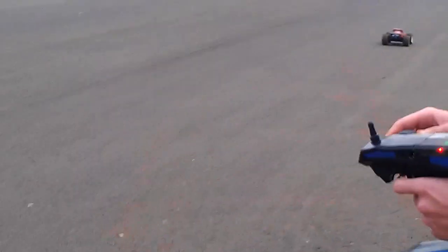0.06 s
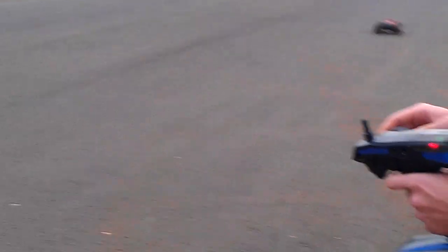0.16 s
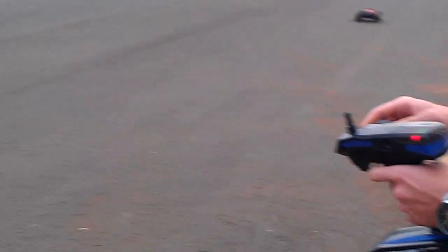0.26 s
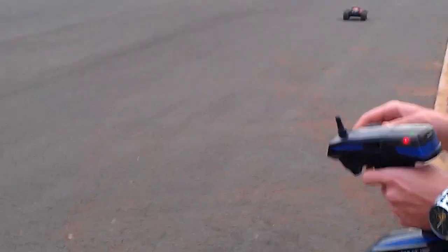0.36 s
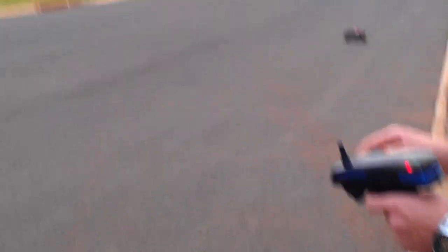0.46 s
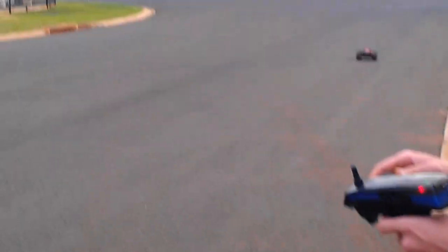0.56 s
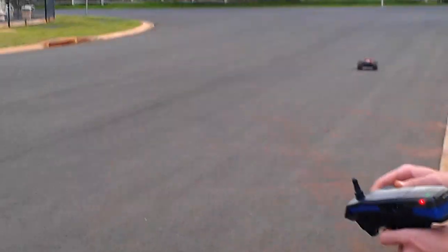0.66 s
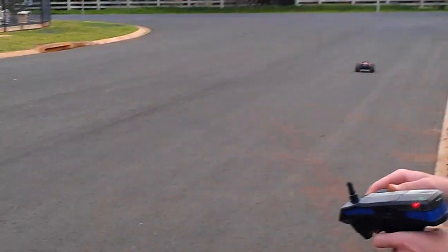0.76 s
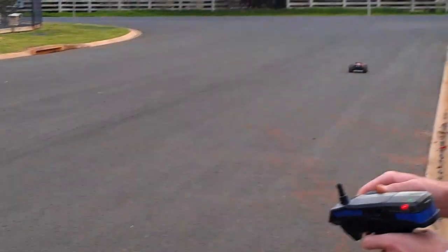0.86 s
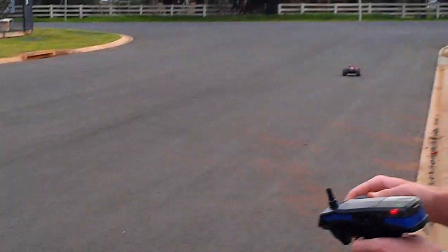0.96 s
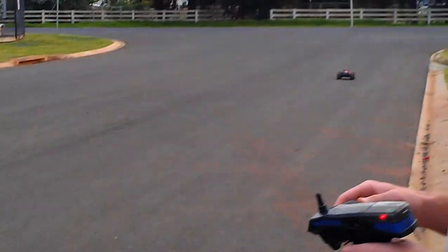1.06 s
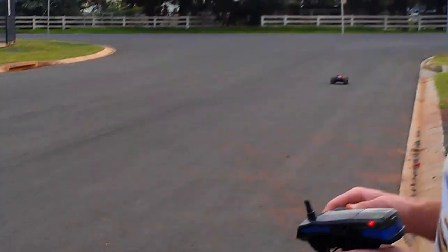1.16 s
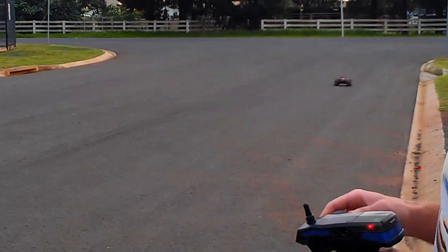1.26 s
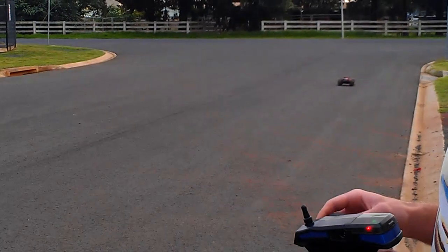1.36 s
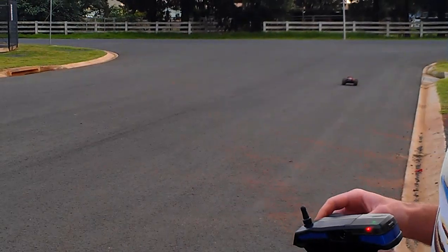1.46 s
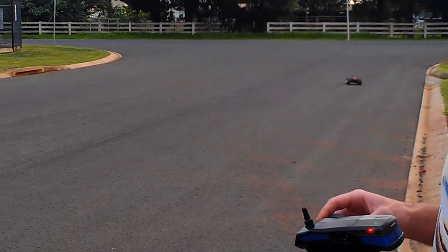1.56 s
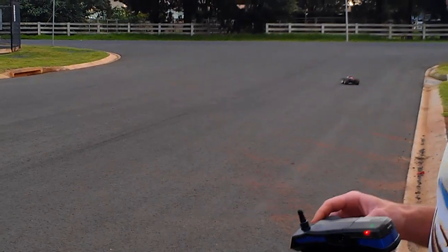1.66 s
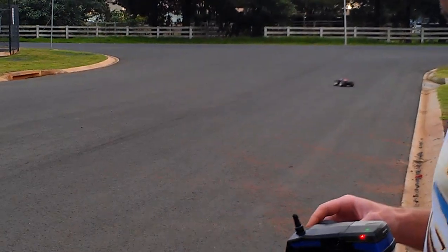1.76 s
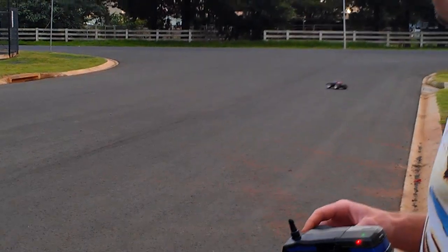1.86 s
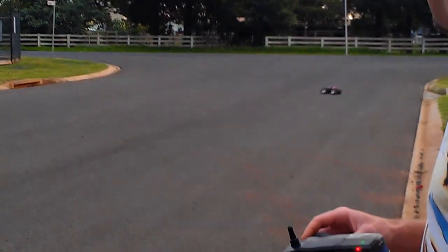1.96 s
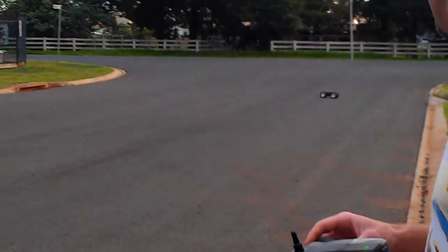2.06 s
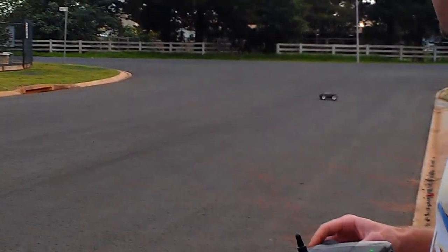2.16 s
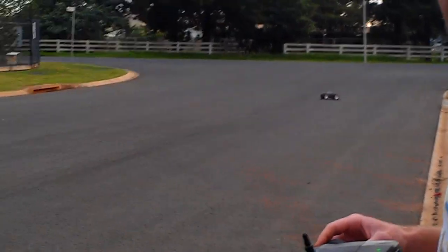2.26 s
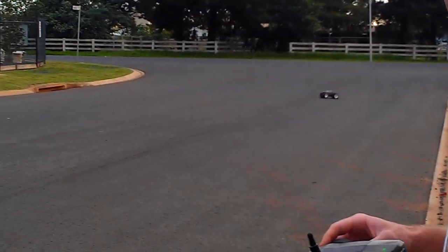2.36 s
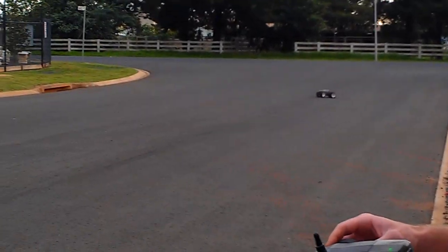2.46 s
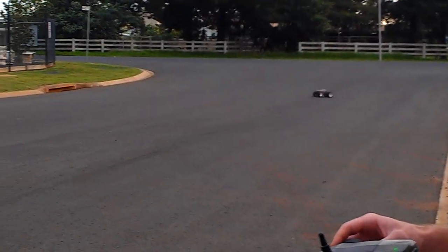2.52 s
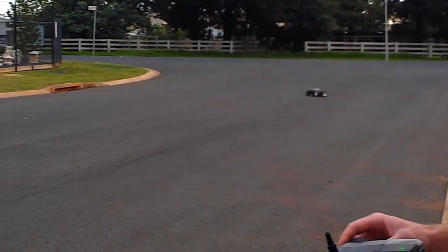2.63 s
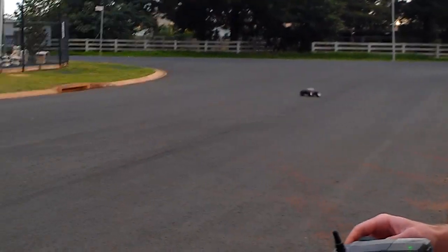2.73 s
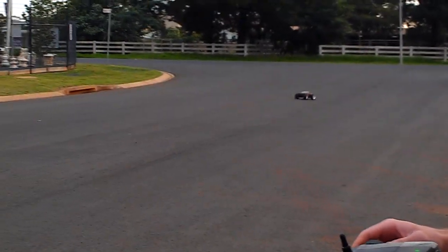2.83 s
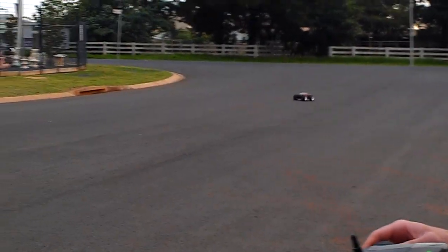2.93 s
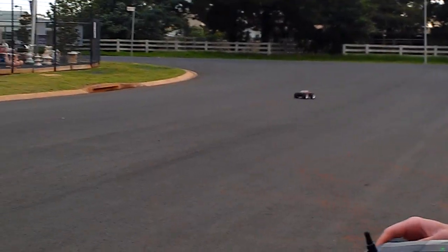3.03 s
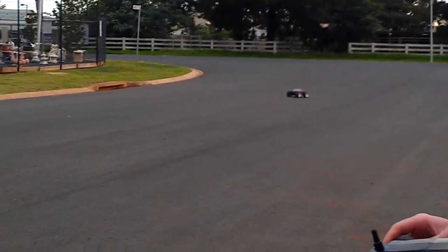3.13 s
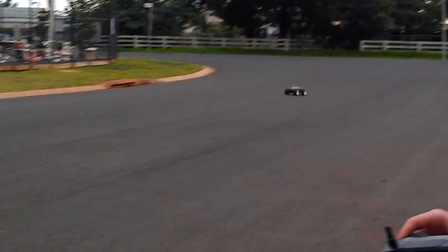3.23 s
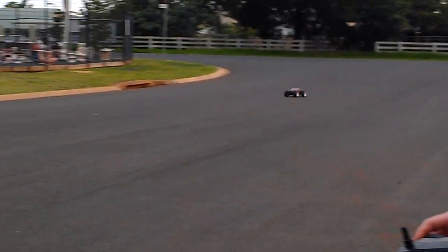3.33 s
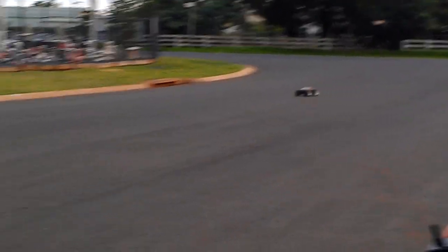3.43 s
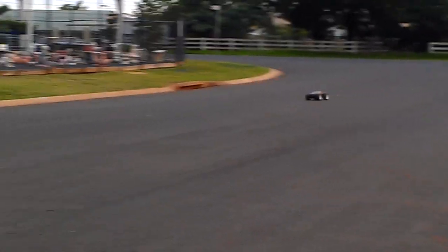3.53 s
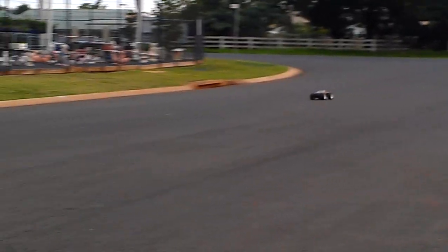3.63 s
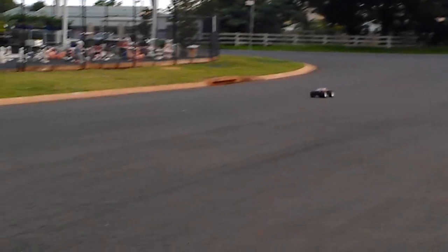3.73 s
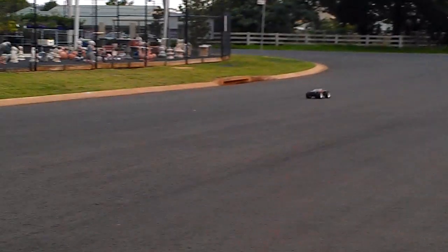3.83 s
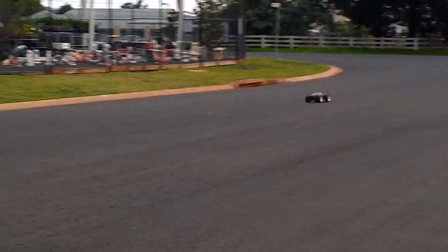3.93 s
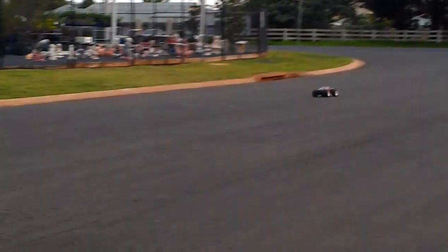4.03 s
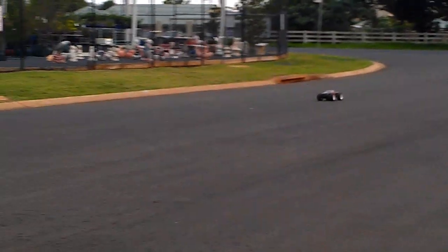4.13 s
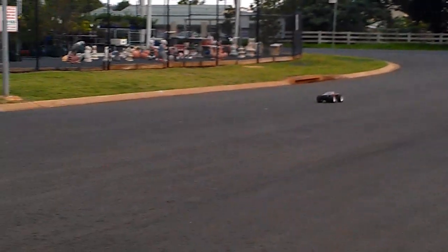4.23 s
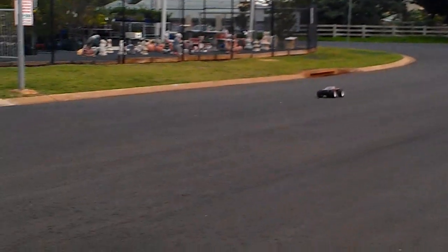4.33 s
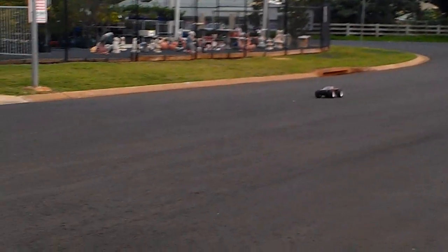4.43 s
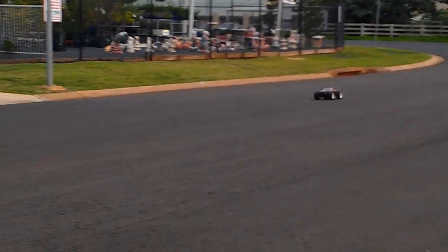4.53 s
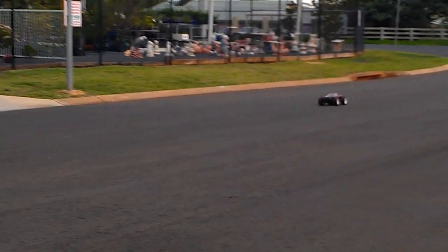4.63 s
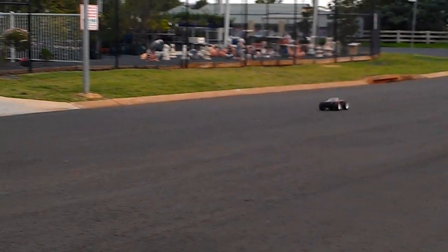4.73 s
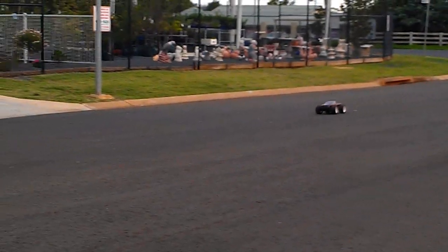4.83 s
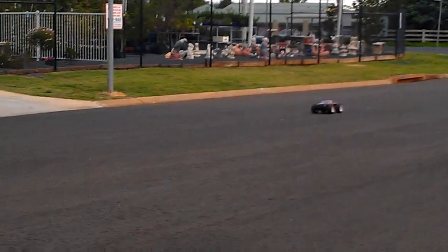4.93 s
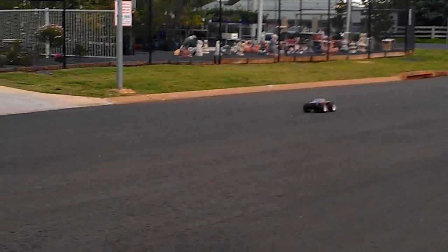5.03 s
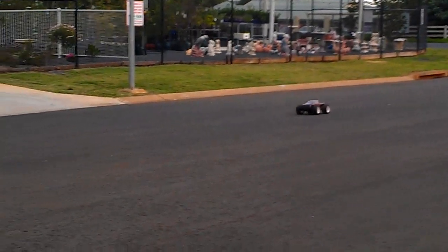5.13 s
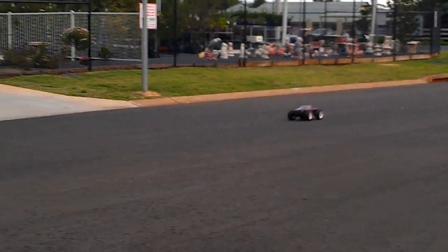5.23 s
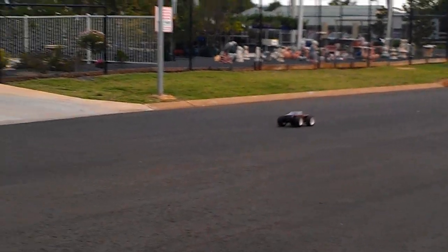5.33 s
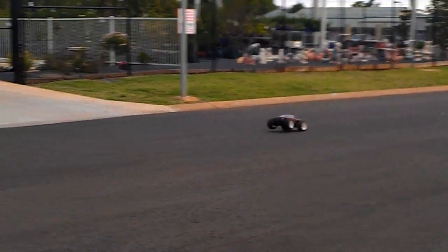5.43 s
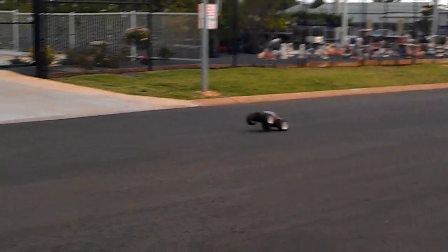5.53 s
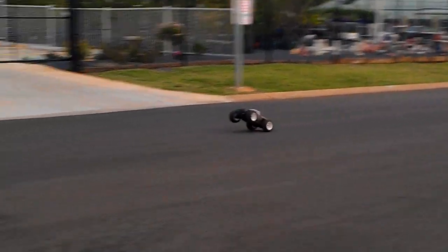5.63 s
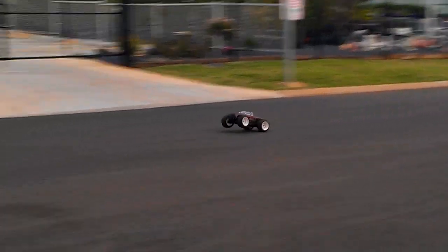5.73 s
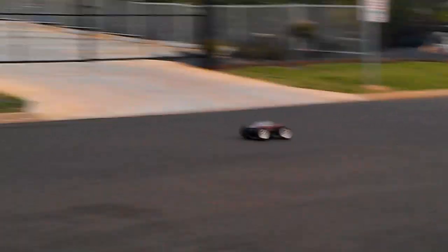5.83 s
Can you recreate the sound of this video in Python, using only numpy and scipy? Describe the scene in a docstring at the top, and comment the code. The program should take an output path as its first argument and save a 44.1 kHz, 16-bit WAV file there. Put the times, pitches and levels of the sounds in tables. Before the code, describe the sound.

On an empty outdoor road, soft wind puffs hit the microphone while a radio-controlled truck rolls away with tyre noise, thin gear ringing and three brief high squeals. After a distant skid, its electric motor winds up and the whine swells in surges as it approaches, a little to the right. Finally it rears up nearby: the pitch shoots up, rubber screeches and the plastic tail clatters on the asphalt, almost overloading the microphone.

```python
"""A small electric radio-controlled truck coasts away over asphalt while soft gusts bump the microphone.
Its tyres roar, its loose gears ring, and the motor gives three short squeals. Near 2 s it skids in a turn.
From 2.5 s it speeds back: the tyres spin, and motor and gears whine, swelling with each throttle squeeze.
Near 5.5 s it rears up close by: rubber screeches, the tail knocks on the road, the treble crackles,
and a limiter holds the loudest moments at the edge of overload."""
import sys
import numpy as np
from scipy import signal
from scipy.fft import rfft, irfft
from scipy.io import wavfile
from scipy.ndimage import uniform_filter1d, minimum_filter1d

SR = 44100
rng = np.random.default_rng(int(sys.argv[2]) if len(sys.argv) > 2 else 0)


def wrap_up_sound(samples):
    """Save the sound to the file named by the first command line argument, as 16-bit audio."""
    columns = np.atleast_2d(samples).T
    # keep every value between -1 and 1, then stretch to whole-number steps
    tamed = np.clip(columns, -1, 1)
    steps = np.round(tamed * 32767).astype(np.int16)
    wavfile.write(sys.argv[1], SR, steps)


N = 259308
T = np.arange(N) / SR
BINS_HZ = np.fft.rfftfreq(N, 1 / SR)

# Noise spectra. Each row: frequency in Hz, relative density in dB.
STILL_AIR_SPECTRUM = [(50, -53.5), (130, -40), (500, 7), (900, 0.5), (2500, 0), (4000, -18), (6500, -14),
                      (10200, -21.5), (11200, -69.5), (16000, -63.5)]
WIND_SPECTRUM = [(25, -57.5), (70, -46), (130, -7.5), (190, -4), (260, 6.5), (340, 3), (450, -1),
                 (650, 1.5), (1500, -39), (5000, -71)]
TREAD_SPECTRUM = [(60, -60.5), (190, -38.5), (265, -28.5), (340, -25.5), (500, -13), (620, -4.5), (740, 7),
                  (860, 3), (1000, -2.5), (1200, -8), (1650, -7), (2300, -6), (4000, -26), (10000, -58.5)]
RATTLE_SPECTRUM = [(300, -70.5), (1100, -9), (1400, -4.5), (1650, -5.5), (1830, 1.5), (1990, 11),
                   (2180, -0.5), (2330, -4), (2570, 4.5), (2800, -3), (3000, -2), (3200, -3), (3400, -2),
                   (3600, -4), (4250, -22.5), (4700, -10), (6500, -25.5), (11000, -74)]
GRIT_SPECTRUM = [(1000, -44), (3600, -7.5), (3900, 7.5), (4150, 12), (4300, 12), (4500, 0.5), (4780, 2),
                 (4970, 6), (5170, -0.5), (5370, 4.5), (5600, -2.5), (5950, -2), (6400, -11), (8500, -12.5),
                 (10200, -46.5), (11200, -62), (16000, -77)]
SCREECH_SPECTRUM = [(1000, -44.5), (2150, 3.5), (2500, 3.5), (2950, 5.5), (3450, -1.5), (3780, -12),
                    (4050, 0), (4350, 7), (4850, 1), (5250, 0), (5800, -24), (6600, -44.5), (11000, -69),
                    (13000, -91)]
WHEELSPIN_SPECTRUM = [(3000, -27), (3550, -4), (3850, -16), (4480, -2), (4850, -14), (5250, 7), (5550, -5),
                      (6050, -8), (6400, -22), (10000, -45)]
OVERLOAD_GRIT_SPECTRUM = [(3000, -7), (5700, 6), (7000, -6), (9500, -3), (13800, -2), (14800, -35)]
KNOCK_SPECTRUM = [(60, -52), (400, -33), (800, 5), (1200, -11.5), (2100, 7), (3400, 2), (4300, 0),
                  (5800, -10.5), (7000, -23), (10000, -40), (14000, -61), (16000, -64)]
CHATTER_SPECTRUM = [(1500, -30), (3000, -7), (3800, -2), (4300, 0), (4700, -10), (7000, -45)]

# Breeze strength. Each row: time in seconds, level in dB.
WIND_LEVEL = [(0, -47), (.3, -42.5), (.55, -40.5), (.75, -47.5), (.95, -52.5), (1.6, -58.5), (2.6, -62),
              (4.1, -55), (5.3, -59), (5.88, -61)]
# Gusts on the microphone. Each row: time in seconds, peak in dB.
GUSTS = [(.152, -30), (.277, -33), (.302, -33), (.344, -25), (.373, -31), (.457, -32), (.52, -35),
         (.59, -35), (.62, -33), (.657, -31), (.784, -24.5), (.813, -36), (.882, -38), (.91, -28.5),
         (.99, -39), (1.17, -44), (1.335, -42), (1.362, -39), (1.408, -37.5), (3.41, -40), (4.655, -41),
         (4.70, -38), (4.78, -38.5)]

# Truck path. Each row: time in seconds, distance in m, road speed in m/s.
PATH = [(0, 6.56, 8.27), (.6, 8.45, 7), (1.3, 16.1, 5.1), (2.2, 7.2, 1.7), (3.1, 14.3, 6.7), (3.6, 9.7, 7),
        (4.45, 13.4, 9.56), (4.8, 11.65, 7.26), (5.3, 6.1, 4.4), (5.6, 8.6, 7.3), (5.88, 6.6, 3.2)]
# Throttle squeezes. Each row: start, rise and hold in seconds, effort in dB.
THROTTLE = [(2.463, 0.035, 0.59, 6), (3.04, .42, .03, 13), (3.728, 0.3, 0.22, 7.5), (4.46, 0.26, 0.4, 9),
            (4.934, 0.13, 0.13, 19.5), (5.177, 0.35, 0.16, 25.5), (5.792, 0.06, 0.0068, 20)]
# Grip lost in the turn, at launch and on rearing.
# Each row: start, rise and hold in seconds, roar and screech in dB, wheel slip from 0 to 1.
SKIDS = [(1.68, 0.22, 0.05, -36.5, -53.5, 0), (1.967, 0.27, 0.35, -46.5, -73, 0.15),
         (2.516, 0.2, 0.18, -36, -37, 0.27), (3.0, 0.36, 0.11, -41.5, -38, 0.11),
         (5.309, 0.081, 0.177, -38, -19, 0.51), (5.464, 0.089, 0.059, -24, -24.5, 0.23)]
# Narrow ringing bands heard while coasting; the lowest two add a hollow colour.
# Each row: centre and width in Hz, gain in dB.
COAST_BANDS = [(685, 41, -0.5), (782, 50, 0), (1710, 200, -1.5), (1894, 89, 8), (1980, 55, 1),
               (2390, 90, 3.5), (2630, 70, -4.5), (2730, 60, -1), (3220, 80, -7)]
# Coasting gear tones. Each row: start and end in seconds, first and last pitch in Hz, level in dB.
COAST_TONES = [(.6, 1.5, 3215, 3140, -57), (.3, 1.05, 2790, 2600, -52), (-.2, .8, 850, 690, -42)]
# Slack jolt, then tail strikes. Each row: start in seconds, level in dB, 60 dB decay time in seconds.
KNOCKS = [(2.558, -35, 0.1), (5.462, -6, 0.066), (5.504, -12, 0.059), (5.518, -1, 0.016), (5.557, -8, 0.04),
          (5.609, -17, 0.018), (5.656, -4, 0.028), (5.703, -13, 0.036), (5.752, -18, 0.025),
          (5.773, -6, 0.065), (5.814, -18.5, 0.072), (5.851, -18.5, 0.088)]
# Dry ticks. Each row: start in seconds, level in dB.
TICKS = [(1.248, -35), (2.531, -32), (3.814, -28.5), (5.443, -30), (5.507, -11), (5.518, -7.5), (5.61, -29),
         (5.668, -26), (5.775, -27)]
# Motor squeals, two rows apiece. Each row: start and length in seconds, first and last pitch in Hz,
# level in dB, rise in seconds, fade in dB/s, lower neighbour, upper neighbour and chatter in dB.
SQUEALS = [(0.213, 0.017, 4740, 4610, -26.5, 0.0055, 298, -62, -59, -50),
           (0.241, 0.24, 4530, 4315, -30.5, 0.0051, 15, -61, -50, -35),
           (1.333, 0.044, 4900, 4750, -55, .01, 100, -70, -62, -70),
           (1.361, .24, 4730, 4500, -46, 0.077, 13, -54, -64, -43.5),
           (1.7, 0.047, 4880, 4560, -46, 0.011, 250, -68, -57, -65),
           (1.709, 0.2, 4550, 4390, -44.5, 0.059, 80, -58, -54, -52)]

# Motor speed on the run back. Each row: time in seconds, whine pitch in Hz.
WHINE_PITCH = [(2.47, 750), (2.55, 870), (2.567, 1200), (2.59, 1390), (2.63, 1310), (2.648, 1620),
               (2.72, 1810), (2.8, 1740), (2.87, 1765), (2.905, 1850), (2.945, 1665), (3.01, 1765),
               (3.06, 1735), (3.19, 1840), (3.31, 1960), (3.51, 2130), (3.79, 2050), (4.11, 1975),
               (4.38, 1897), (4.7, 1870), (4.9, 1885), (5.05, 1945), (5.21, 2015), (5.31, 2110),
               (5.36, 2290), (5.43, 2920), (5.485, 3650), (5.5, 2030), (5.56, 2190), (5.62, 2090),
               (5.79, 2150)]
# Weaker shaft tones. Each row: multiple of the shaft rate, relative level in dB.
SHAFT_ORDERS = [(3, -12.5), (7, 3), (8, -1.5), (9, -14.5), (11, 0), (12.5, -7), (13, 3), (13.6, -6),
                (14, -15.5), (15, -7), (16, -5.5), (17, -12), (18, -2)]
# Gear case resonances. Each row: centre and width in Hz, gain in dB.
GEAR_CASE_MODES = [(1971.7, 117, 13.5), (3160, 520, -10), (4131, 162, 7)]
# Beaming as the truck turns and tilts. Each row: time in seconds, whine and octave gain in dB.
BEAMING = [(2.57, -6, 7), (2.67, -7, -9), (2.76, -2.5, -3), (3.1, -1.5, 6), (3.33, -5, 2), (3.45, -6, 0),
           (3.8, 2.5, -1.5), (4.15, 2, 0), (4.55, -0.5, 1), (4.9, -11.5, 3), (5.05, -4, 1), (5.2, -0.5, 7),
           (5.31, 4.5, 8.5), (5.36, 8, 9), (5.42, 4.5, -9), (5.48, 3, -3), (5.52, -4, 5.5),
           (5.62, -4.5, -24), (5.78, -13, -4)]
# Motor radiation through the plastic body. Each row: frequency in Hz, gain in dB.
BODY_RESPONSE = [(300, -3), (700, 3), (4400, 0), (5900, -3), (6600, -13), (9000, -37.5)]

# Noise likeness between the two microphone ports. Each row: frequency in Hz, coherence from 0 to 1.
PORT_COHERENCE = [(100, 0.34), (300, 0.91), (700, 1), (2000, 0.99), (4500, 0.69), (8000, 0.41)]
# Phase between the ports. Each row: frequency in Hz, left lead in radians.
PORT_PHASE = [(100, -2), (350, -1.66), (700, -1.925), (1200, -1.4), (2100, -1.24), (3200, -1.18),
              (4200, -1.06), (5500, 0.76)]
# Truck's side. Each row: time in seconds, left minus right in dB before PORT_SHADOW scales it.
BALANCE = [(0, -4), (1.8, -4.5), (2.2, -3.5), (3.7, -4), (3.95, -6), (4.5, -4.5), (5.2, -6), (5.7, -5.5)]
# Shading of the left port. Each row: frequency in Hz, factor on BALANCE.
PORT_SHADOW = [(100, 0.84), (330, 0.43), (700, 0.21), (1200, 0.19), (2000, 1.3), (3200, 0.93), (4300, 2.02),
               (6000, 1.1), (9000, 2.26)]
# One echo per port, left first. Each row: delay in seconds, gain.
PORT_ECHOES = [(.010113, .35), (.01, .25)]

REF_M, REF_M_PER_S = 10, 6
# Base levels, before distance, speed and effort apply.
ROAR_DB, RATTLE_DB, GRIT_DB, COAST_RING_DB = -41, -45, -47.5, -43.5
WHINE_DB, OCTAVE_DB, SHAFT_DB, HUM_DB = -41, -44.5, -52.5, -53.5
RELEASE_DB_PER_S, REGRIP_DB_PER_S, ROLLING_SLIP = 95, 67, 0.0918
WHINE_ORDER, WHINE_CYCLES_PER_WHEEL_TURN = 6, 44
FULL_SPIN_HZ = 2007  # below this whine pitch the other motor tones fade
LIMIT, LIMIT_RATIO, LOW_CUT_HZ, HIGH_CUT_HZ = .82, 2.2, 122, 15000


def amp(db):
    """Decibels to gain."""
    return 10 ** (np.asarray(db) / 20)


def unit(x):
    """Scale to rms 1."""
    return x / np.sqrt(np.mean(abs(x) ** 2) + 1e-20)


def at_hz(points, hz):
    """Interpolate on a log-frequency axis."""
    points_hz, values = np.transpose(points)
    return np.interp(np.log(hz + 1), np.log(points_hz + 1), values)


def curves(rows):
    """Value columns of a timed table, per sample."""
    times_s, *columns = np.transpose(rows)
    return [np.interp(T, times_s, column) for column in columns]


def during(start_s, end_s, fade_s):
    """Gate with linear fades."""
    return np.clip(np.minimum(T - start_s, end_s - T) / fade_s, 0, 1)


def pulse(centre_s, half_width_s):
    """Gaussian envelope."""
    return np.exp(-((T - centre_s) / half_width_s) ** 2)


def burst(start_s, t60_s):
    """Sharp attack, exponential decay."""
    age_s = np.maximum(T - start_s, 0)
    return (1 - np.exp(-age_s / 0.00068)) * np.exp(-np.log(1000) * age_s / t60_s)


def wander(rate_hz):
    """Smooth random drift, rms 1."""
    return unit(irfft(rfft(rng.standard_normal(N)) / np.sqrt(1 + (BINS_HZ / rate_hz) ** 4), N))


def noise(spectrum, drive=1):
    """Coloured noise, modulated by drive, partly coherent in the two ports; rms 1."""
    left, other = rfft(rng.standard_normal((2, N)) * drive)
    coherence = np.clip(at_hz(PORT_COHERENCE, BINS_HZ), 0, 1)
    right = coherence * left + np.sqrt(1 - coherence ** 2) * other
    return unit(irfft(np.array([left, right]) * amp(at_hz(spectrum, BINS_HZ)), N))


def ring(modes):
    """Noise through narrow bands, rms 1."""
    gain = sum(amp(db) / np.sqrt(1 + (2 * (BINS_HZ - hz) / width_hz) ** 4) for hz, width_hz, db in modes)
    return unit(irfft(rfft(rng.standard_normal(N)) * gain, N))


def partial(cycles, smear, width_hz, evenness=0):
    """A tone with a share smeared into a narrow band by rattling; evenness steadies its level."""
    smear = np.clip(smear, 0, 1)
    white = rng.standard_normal(N) + 1j * rng.standard_normal(N)
    flutter = unit(np.fft.ifft(np.fft.fft(white) / (1 + (np.fft.fftfreq(N, 1 / SR) / width_hz) ** 2)))
    swing = np.sqrt(1 - smear) + np.sqrt(smear) * flutter
    swing = unit(swing / np.sqrt(1 + evenness * abs(swing) ** 2))
    return np.sqrt(2) * (swing * np.exp(2j * np.pi * cycles)).real


def breeze(puff_hz=355, puff_s=.0028):
    """Lumpy low air noise; single gusts land as soft bumps."""
    phases = rng.uniform(0, 2 * np.pi, len(GUSTS))
    puffs = sum(amp(db) * pulse(s, puff_s) * np.cos(2 * np.pi * puff_hz * (T - s) + phase)
                for (s, db), phase in zip(GUSTS, phases))
    return amp(curves(WIND_LEVEL)[0] + 3.74 * wander(27)) * noise(WIND_SPECTRUM) + puffs


def scatter(x, t60_s=1.0):
    """Kerbs and fences return a short tail, different in each port."""
    age_s = np.arange(SR // 2) / SR
    taps = rng.standard_normal((2, len(age_s))) * (age_s > .004) * amp(-60 * age_s / t60_s)
    return signal.fftconvolve(x, taps / np.linalg.norm(taps, axis=1, keepdims=True), axes=1)[:, :N]


def nearness_db():
    """Sound spreads as one over distance."""
    return 20 * np.log10(REF_M / np.maximum(curves(PATH)[0], 1))


def rolling_db(power):
    """Rolling parts gain with nearness and a power of road speed."""
    return nearness_db() + power * 20 * np.log10(np.maximum(curves(PATH)[1], 1) / REF_M_PER_S)


def throttle_db():
    """Each squeeze ramps up the drive train load, holds, and lets go."""
    pushes = [db * np.clip((T - s) / rise_s, 0, 1)
              - RELEASE_DB_PER_S * np.maximum(T - s - rise_s - hold_s, 0)
              for s, rise_s, hold_s, db in THROTTLE]
    return np.maximum(np.max(pushes, axis=0), 0)


def skidding():
    """Skids build, hold, and die as the tread regrips. Returns roar gain, screech gain, slip."""
    total = np.zeros((3, N))
    for s, rise_s, hold_s, roar_db, screech_db, slip in SKIDS:
        regrip = amp(-REGRIP_DB_PER_S * np.maximum(T - s - rise_s - hold_s, 0))
        total += np.outer([amp(roar_db), amp(screech_db), slip], np.clip((T - s) / rise_s, 0, 1) * regrip)
    return total


def wheel_rad():
    """Wheel angle, geared down from the motor."""
    return 2 * np.pi * np.cumsum(curves(WHINE_PITCH)[0] / WHINE_CYCLES_PER_WHEEL_TURN) / SR


def wheel_load():
    """Lopsided load, repeating once a wheel turn; rms 1."""
    angle_rad = wheel_rad()
    return unit(np.cos(angle_rad) + 1.2 * np.sin(2 * angle_rad))


def rolling():
    """Tread roars on asphalt; gear rattle and grit crackle pulse with the wheels."""
    effort_db, load, bumps = throttle_db(), wheel_load(), wander(74)
    stones = amp(1.1 * wander(1300))
    roar_gain = np.hypot(amp(ROAR_DB + rolling_db(power=0.83)), skidding()[0]) * amp(0.96 * bumps)
    rattle_db = RATTLE_DB + rolling_db(power=1.5) + 0.97 * effort_db + 1.7 * bumps + 0.073 * load
    grit_db = GRIT_DB + rolling_db(power=2.17) + 0.68 * effort_db + 1.1 * bumps + 0.28 * load
    return (roar_gain * noise(TREAD_SPECTRUM)
            + amp(rattle_db) * noise(RATTLE_SPECTRUM, stones)
            + amp(grit_db) * noise(GRIT_SPECTRUM, stones))


def coast_ring():
    """Narrow bands ring while the truck coasts, fading as the motor takes up the slack."""
    fade = 1 - during(WHINE_PITCH[0][0], np.inf, fade_s=0.43)
    return amp(COAST_RING_DB + rolling_db(power=1.0)) * ring(COAST_BANDS) * fade


def coasting():
    """Thin gear tones sink as the truck rolls away."""
    out = np.zeros(N)
    for start_s, end_s, first_hz, last_hz, db in COAST_TONES:
        cycles = np.cumsum(np.interp(T, [start_s, end_s], [first_hz, last_hz])) / SR
        out += amp(db) * during(start_s, end_s, fade_s=.25) * partial(cycles, .9, width_hz=40)
    return out


def screech(squeak_hz=5300, hoot_hz=900):
    """Rubber and plastic stick and slip: chirping bands, a wavering squeak, one brief hollow note."""
    bands = signal.stft(noise(SCREECH_SPECTRUM), SR, nperseg=512, noverlap=384)[2]
    patches = uniform_filter1d(rng.standard_normal(bands.shape[1:]), size=7, axis=1)
    patches = unit(uniform_filter1d(patches, size=3, axis=0))
    chirps = signal.istft(bands * amp(5.4 * patches), nperseg=512, noverlap=384)[1][:, :N]
    hoot = amp(-18) * pulse(5.733, .008) * partial(hoot_hz * T, 0.34, width_hz=54)
    squeak_gain = amp(-19 + 3.4 * wander(30))
    squeak_cycles = np.cumsum(squeak_hz * (1 + 0.063 * wander(18))) / SR
    squeak = squeak_gain * partial(squeak_cycles, 0.55, width_hz=130)
    return skidding()[1] * (unit(chirps) + squeak) + hoot


def wheelspin():
    """Spinning tyres rasp at launch."""
    gain = amp(-39.5 + 1.5 * wheel_load()) * during(2.71, 2.96, fade_s=0.066)
    return gain * noise(WHEELSPIN_SPECTRUM, drive=amp(1.9 * wander(600)))


def overload_grit():
    """Gritty, scrape-like treble crackle at the loudest moment."""
    gain = amp(-41 + 2.86 * wander(70)) * during(5.48, 5.7, fade_s=0.015)
    return gain * noise(OVERLOAD_GRIT_SPECTRUM, drive=amp(4.4 * wander(1530)))


def knocks():
    """Blows on the plastic chassis, a separate low thump, and dry ticks."""
    thump = amp(-33) * burst(5, t60_s=.09) * noise([(30, -2), (140, -6), (400, -21), (1500, -70)])
    blows = sum(amp(db) * burst(s, t60_s) for s, db, t60_s in KNOCKS) * noise(KNOCK_SPECTRUM)
    tick_gain = sum(amp(db) * burst(s, t60_s=0.0082) for s, db in TICKS)
    return blows + thump + tick_gain * noise([(1000, -34), (5000, 5), (12000, -3), (14000, -46)])


def brake_chatter():
    """The brake lets go of each squeal with a short, rough chatter."""
    gain = sum(amp(db) * pulse(s + length_s, .01) for s, length_s, *_, db in SQUEALS)
    return gain * noise(CHATTER_SPECTRUM)


def squeals(sag_hz=150, sag_s=0.008, whistle_hz=2845):
    """Shaft order 12 sings as the truck slows, with orders 11 and 13 and a steady lower whistle."""
    out = np.zeros(N)
    for s, length_s, first_hz, last_hz, db, rise_s, fade_db_per_s, below_db, above_db, _ in SQUEALS:
        age_s = np.clip(T - s, 0, length_s)
        glide_hz = first_hz + (last_hz - first_hz) * age_s / length_s
        hz = glide_hz - sag_hz * np.exp((age_s - length_s) / sag_s)
        cycles = np.cumsum(hz * (1 + 0.0022 * wander(50))) / SR
        gain = np.minimum(age_s / rise_s, 1) ** 2 * amp(db - fade_db_per_s * np.maximum(age_s - rise_s, 0))
        below = amp(below_db) * partial(cycles * 11 / 12, .15, width_hz=40)
        above = amp(above_db) * partial(cycles * 13 / 12, .15, width_hz=40)
        whistle = amp(-57) * partial(whistle_hz * T, .15, width_hz=25)
        faint = (below + above + whistle) * during(s, s + length_s, 0.058)
        out += (gain * partial(cycles, 0.02, width_hz=140) + faint) * during(s, s + length_s, 0.0054)
    return out


def gear_case_db(hz):
    """Lift of a tone crossing the gear case resonances."""
    lift = sum(amp(db) / (1 + (2 * (hz - centre_hz) / width_hz) ** 2)
               for centre_hz, width_hz, db in GEAR_CASE_MODES)
    return 20 * np.log10(1 + lift)


def shaft_binding(wobble_rad=.6):
    """Drive shafts bind twice a wheel turn and chop the tones, deeper under load."""
    angle_rad = 2 * wheel_rad() + wobble_rad * wander(25)
    depth = np.minimum(.13 + .023 * throttle_db(), 1)
    return (1 + depth * np.cos(angle_rad)) / np.sqrt(1 + depth ** 2 / 2)


def motor():
    """Shaft tones swell with effort and throb with the wheels; slip makes them stutter and rasp."""
    hz, near_db, effort_db = curves(WHINE_PITCH)[0], nearness_db(), throttle_db()
    whine_beam_db, octave_beam_db = curves(BEAMING)
    spin = np.minimum(hz / FULL_SPIN_HZ, 1)
    skid_slip = skidding()[2]
    slip = ROLLING_SLIP + skid_slip
    cycles = np.cumsum(hz * (1 + 0.002818 * wander(25.74) + 0.0523 * slip * wander(237))) / SR
    shaft_turns = cycles / WHINE_ORDER

    whine = partial(cycles, .08 + .5 * slip + .005 * effort_db, width_hz=85, evenness=1.5)
    whine *= amp(WHINE_DB + near_db + whine_beam_db + 0.43 * effort_db + 10.1 * slip + gear_case_db(hz))
    octave = partial(2 * cycles, .13 + .45 * slip + .014 * effort_db, width_hz=110, evenness=1.5)
    octave += amp(-8) * ring([(4150, 320, 0)])  # broad gear case band
    octave *= amp(OCTAVE_DB + near_db + octave_beam_db + 0.78 * effort_db - 5.3 * slip)
    octave *= amp(gear_case_db(2 * hz)) * spin ** 3
    orders = sum(amp(db) * partial(order * shaft_turns, .65, width_hz=40) for order, db in SHAFT_ORDERS)
    orders *= amp(SHAFT_DB + near_db + 0.79 * effort_db - 10 * slip) * spin ** 3

    throb_db = .8 * wheel_load()
    stutter_db = 6 * np.minimum(slip, .4) * np.tanh(wander(40))
    rasp = 1 + 1.1 * skid_slip * np.cos(2 * np.pi * shaft_turns)
    tones = ((whine + octave) * shaft_binding() + orders) * amp(throb_db + stutter_db) * rasp
    radiated = irfft(rfft(tones) * amp(at_hz(BODY_RESPONSE, BINS_HZ)), N)
    slow_gear_hum = amp(HUM_DB - 25 * slip) * spin ** 4 * partial(.132 * cycles, 0.47, width_hz=15)
    return (radiated + slow_gear_hum) * during(WHINE_PITCH[0][0], WHINE_PITCH[-1][0], fade_s=0.0058)


def microphone_ports(x):
    """The housing shades the left port; the right one leads in phase except in the high treble."""
    hz, times_s, bands = signal.stft(x, SR, nperseg=1024, noverlap=768)
    side_db = at_hz(PORT_SHADOW, hz)[:, None] * np.interp(times_s, *np.transpose(BALANCE))
    left_phase = np.exp(1j * at_hz(PORT_PHASE, hz))[:, None]
    ports = np.array([amp(side_db / 2) * left_phase, amp(-side_db / 2)])
    return signal.istft(bands * ports / abs(ports).mean(0), nperseg=1024, noverlap=768)[1][:, :N]


def scene():
    """Truck, scatter, breeze and still air, all placed to the right."""
    truck = rolling() + screech() + wheelspin() + overload_grit()
    truck = truck + coast_ring() + coasting() + motor() + squeals() + brake_chatter()
    mix = truck + amp(-10.5) * scatter(truck) + knocks() + breeze() + amp(-49) * noise(STILL_AIR_SPECTRUM)
    return microphone_ports(mix)


def record(dry):
    """Short hollowing echo, fast limiter, soft clip, band limits."""
    heard = np.array([x + gain * np.interp(T - delay_s, T, x, left=0)
                      for x, (delay_s, gain) in zip(dry, PORT_ECHOES)])
    peak = uniform_filter1d(-minimum_filter1d(-abs(heard), size=220, axis=1), size=220, axis=1)
    limited = heard * np.maximum(peak / LIMIT, 1) ** (1 / LIMIT_RATIO - 1)
    clipped = limited / (1 + limited ** 20) ** (1 / 20)
    thinned = signal.sosfilt(signal.butter(2, LOW_CUT_HZ, "highpass", fs=SR, output="sos"), clipped)
    lowpass = signal.firwin(511, HIGH_CUT_HZ, window=("kaiser", 9), fs=SR)
    return signal.oaconvolve(thinned, lowpass[None], "same")


dry = scene()
out = record(dry)
wrap_up_sound(out)
```